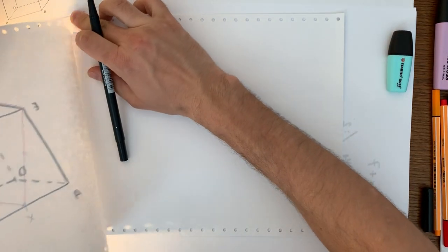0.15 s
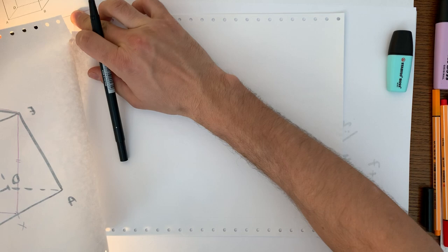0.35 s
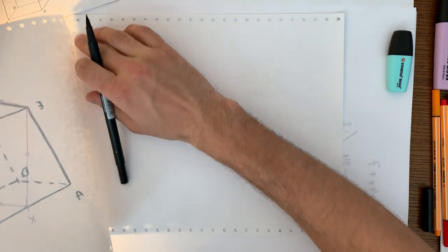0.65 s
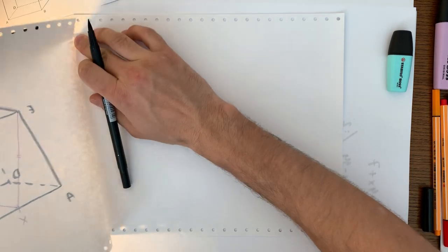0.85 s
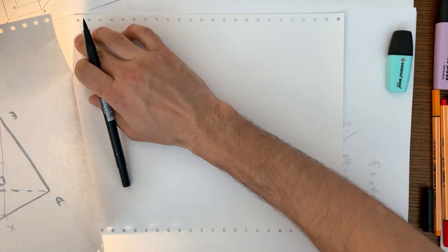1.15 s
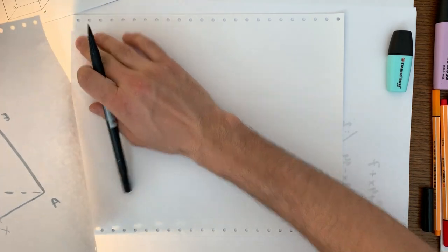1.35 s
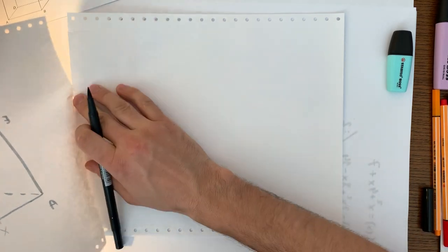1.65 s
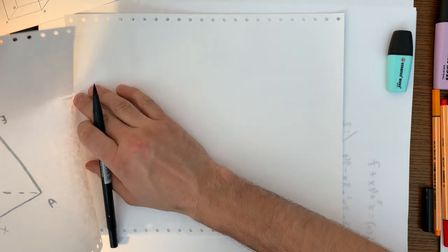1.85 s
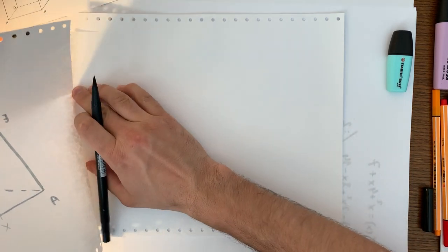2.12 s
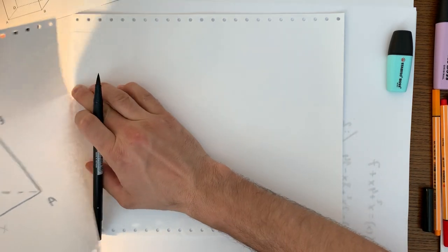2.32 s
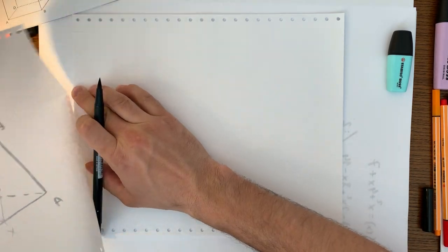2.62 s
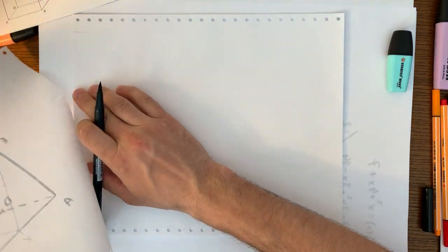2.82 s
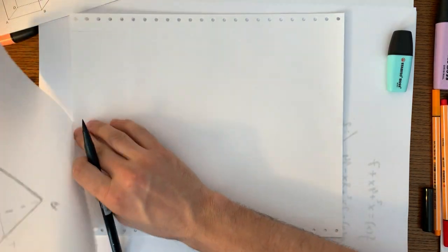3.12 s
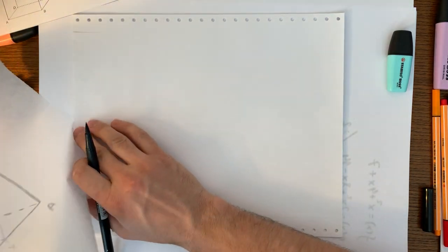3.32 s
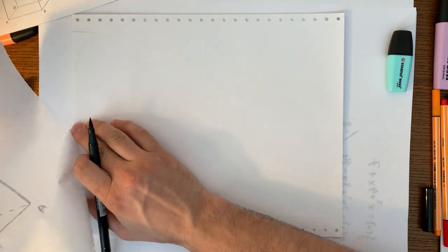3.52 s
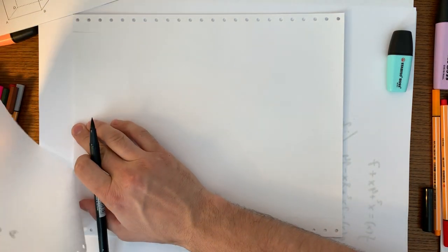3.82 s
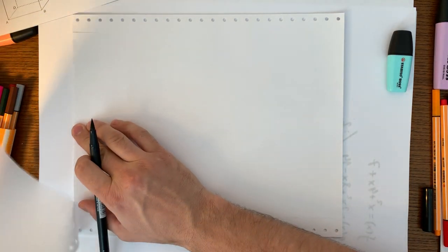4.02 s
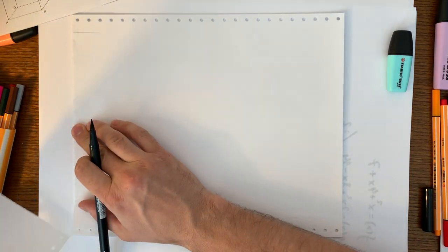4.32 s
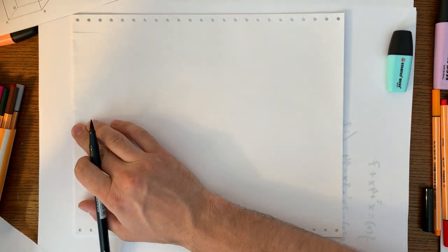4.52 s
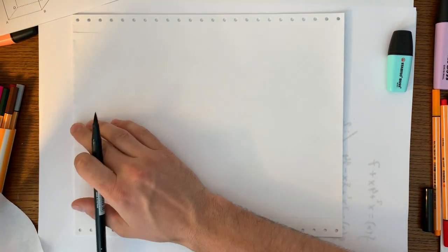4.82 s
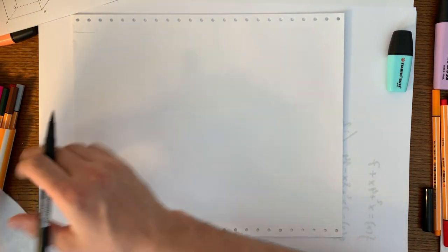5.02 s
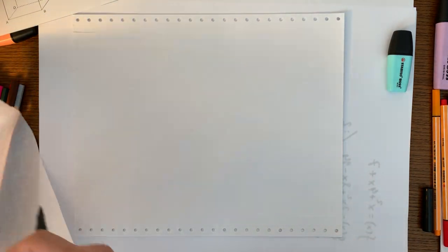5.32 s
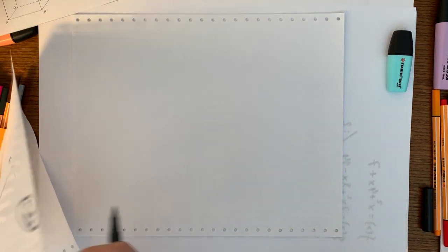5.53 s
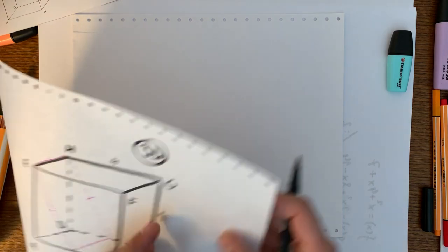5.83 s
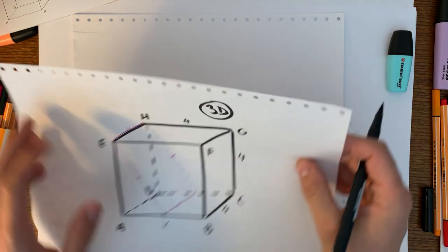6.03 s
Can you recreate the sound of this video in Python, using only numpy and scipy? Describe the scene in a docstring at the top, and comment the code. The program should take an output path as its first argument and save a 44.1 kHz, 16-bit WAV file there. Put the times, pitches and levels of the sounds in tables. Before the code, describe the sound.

Continuous paper is torn along its perforation on a desk in several short pulls. Each pull gives a run of bright, crisp cracks with a rasping hiss and a faint thud from the desk. Between pulls the sheets slide and bend with duller pops. After the longest run of tearing, the sheet rustles and flaps more softly. The sound is close, in a small, quiet room.

```python
"""Runs of bright cracks and rustling: continuous paper is torn along its perforation on a desk.
Each tiny paper bridge between the holes snaps and shakes the sheet, and creases give duller pops.
Between pulls the sheets slide and bend, and the desk thuds faintly under the hand.
The walls of the small, quiet room add a short tail to every snap and pop."""
import sys
import numpy as np
from scipy import signal
from scipy.fft import rfft, irfft
from scipy.io import wavfile

SR = 44100
rng = np.random.default_rng(int(sys.argv[2]) if len(sys.argv) > 2 else 0)


def output_pcm(signal):
    """Save a mono or channel-first signal as 16-bit PCM at the path in sys.argv[1].

    Samples are clipped to [-1, 1] before scaling.
    """
    pcm = np.clip(np.atleast_2d(signal).T, -1, 1) * 32767
    wavfile.write(sys.argv[1], SR, np.round(pcm).astype(np.int16))


N = 271788

# Paper sliding over paper: t/s, hiss level/dB
SLIDE_LEVELS = [(0.0, -48.5), (0.055, -85), (0.11, -58), (0.2, -77), (0.45, -71.5), (0.8, -77), (1.55, -74),
                (1.62, -62), (1.74, -63), (1.95, -88), (2.08, -66), (2.16, -78.5), (2.65, -71), (2.78, -63),
                (2.93, -58.5), (2.99, -72), (3.22, -56), (3.28, -63.5), (3.48, -61.5), (3.61, -76),
                (4.47, -61.5), (4.6, -67.5), (4.77, -60), (5.09, -68), (5.14, -57), (5.32, -50),
                (5.37, -57), (5.57, -63.5), (5.62, -68.5), (5.86, -70.5), (5.96, -58.5), (6.02, -63),
                (6.12, -57), (6.16, -70)]
# The hand pulls against the perforation: full force at t/s, swell/s, hold/s, rasp/dB, flapping/dB
HAND_PULLS = [(0.255, 0.15, 0.031, -44.5, -40), (0.905, .02, .005, -55, -47),
              (1.097, 0.065, 0.064, -42, -40.5), (1.325, 0.014, 0.016, -41.5, -41.5),
              (1.66, 0.063, 0.03, -55, -51), (1.786, 0.043, .01, -46.5, -46.5),
              (2.417, 0.02, 0.073, -37, -41.5), (3.692, 0.024, 0.13, -40, -44.5),
              (4.028, 0.22, 0.099, -37, -45), (4.281, 0.22, 0.086, -43, -46)]
# The held sheet bends and springs back: fully bent at t/s, swell/s, hold/s, rasp/dB, flapping/dB
SHEET_BENDS = [(0.11, 0.05, .06, -75, -78), (0.5, .06, 0.0037, -62, -55),
               (0.616, 0.12, 0.0093, -71.5, -66.5), (0.784, 0.11, 0.012, -76, -60),
               (2.075, 0.2, .07, -71.5, -74), (2.644, 0.18, 0.023, -62, -58),
               (2.863, 0.18, 0.075, -66.5, -67.5), (2.963, 0.086, 0.059, -68, -58.5),
               (3.228, 0.34, 0.046, -59.5, -61.5), (3.364, 0.07, 0.055, -52.5, -50),
               (3.528, 0.12, .02, -61, -63), (4.78, 0.66, 0.26, -63, -68), (5.166, 0.094, 0.18, -58, -59.5),
               (5.57, 0.17, 0.0081, -56.5, -54.5), (5.719, 0.044, .005, -64, -59),
               (5.822, 0.07, .03, -68, -54.5), (5.94, .06, 0.035, -86, -54.5),
               (6.08, .12, 0.074, -85, -56.5)]


def from_db(db):
    """Turn decibels into a number to multiply by."""
    return 10 ** (np.asarray(db) / 20)


def rms_one(x):
    """Scale a signal to an average power of 1."""
    return x / np.sqrt(np.mean(x ** 2) + 1e-20)


def at_hz(points, hz):
    """Read a table between its frequencies, with octaves evenly spaced."""
    freqs, values = np.transpose(points)
    return np.interp(np.log(hz + 1), np.log(freqs), values)


def colour(x, spectrum):
    """Give a sound the tone in the table; white noise keeps its power."""
    size = 8192
    gain = rms_one(from_db(at_hz(spectrum, np.fft.rfftfreq(size, 1 / SR))))
    cepstrum = irfft(np.log(gain))
    # Fold the filter so that it never rings before the sound arrives.
    cepstrum[1:size // 2] *= 2
    cepstrum[size // 2 + 1:] = 0
    return signal.fftconvolve(x, irfft(np.exp(rfft(cepstrum))))[:len(x)]


def resonate(x, hz, width_hz):
    """Let a sound ring broadly around one pitch."""
    r = np.exp(-np.pi * width_hz / SR)
    feedback = [1, -2 * r * np.cos(2 * np.pi * hz / SR), r * r]
    return signal.lfilter(np.array([1, 0, -1]) * (1 - r * r) / 2, feedback, x)


def drift(hz):
    """A random wobble of about size 1, mostly slower than hz."""
    r = np.exp(-2 * np.pi * hz / SR)
    return rms_one(signal.lfilter([1], [1, -2 * r, r * r], rng.standard_normal(N + SR))[SR:])


def fibres(size, spread_db):
    """Grainy noise: paper fibres slip in steps of uneven size."""
    return rms_one(rng.standard_normal(size) * from_db(spread_db * np.minimum(rng.exponential(1, size), 5)))


def gestures(moves, fade_db_per_s, rest_db):
    """Level in dB of hand movements that swell, hold and fade on top of a resting level."""
    t = np.arange(0, N, 32) / SR
    power = from_db(2 * rest_db)
    for full_at, swell, hold, level_db in moves:
        rising = 20 * (full_at - t) / max(swell, .005)   # gains 20 dB during the swell
        fading = fade_db_per_s * (t - full_at - max(hold, 0))
        loss_db = np.maximum(np.maximum(rising, fading), 0)
        power = power + from_db(2 * (level_db - loss_db))
    return np.interp(np.arange(N) / SR, t, 10 * np.log10(power + 1e-30))


def slide_db():
    """Level of the sliding at every sample."""
    return np.interp(np.arange(N) / SR, *np.transpose(SLIDE_LEVELS))


def sliding_hiss(grip):
    """One sheet rubs over another with a high hiss."""
    # Tone of sliding paper: f/Hz, level/dB
    tone = [(2350, -41), (4000, -12.5), (6000, -6.5), (8800, -4), (10000, -4), (12500, -4.5), (15600, -10),
            (15900, -35), (16500, -42)]
    return colour(from_db(slide_db() + 0.9 * grip + 0.7 * drift(100)) * fibres(N, spread_db=-1), tone)


def taut_rasp(grip):
    """Tight paper rasps when pulled or bent, and a little as it slides."""
    # Tone of tight paper: f/Hz, level/dB
    tone = [(710, -39), (1200, 0.5), (1480, -5.5), (2100, 1.5), (3500, 0), (4940, -10.5), (6000, -9.5),
            (7800, -19), (13200, -120)]
    moves = [(t, swell, hold, db) for t, swell, hold, db, _ in HAND_PULLS + SHEET_BENDS]
    level_db = gestures(moves, fade_db_per_s=144, rest_db=slide_db()[::32] - 8.5)
    return colour(from_db(level_db + 1.15 * grip + 1.9 * drift(62)) * fibres(N, spread_db=3), tone)


def room_air():
    """Faint, steady noise fills the quiet room."""
    # Tone of the background noise: f/Hz, level/dB
    tone = [(12, -36), (20, 9), (200, 2), (994, 4.5), (2240, -36), (4160, -6), (12500, -34), (15200, -26),
            (16500, -44)]
    return from_db(-72.5) * colour(rng.standard_normal(N), tone)


def snaps(events, tear_ms, ring_width, ring_db):
    """Fibres strain, break and tear on briefly; the sheet shakes and a patch of it rings."""
    # Tone of breaking fibres: f/Hz, level/dB
    crack_tone = [(1530, -14), (2600, -3.5), (3600, -7), (4500, -9.5), (8160, -10), (13100, -10.5),
                  (15500, -15.5), (16500, -14.5)]
    # Tone of the shaken sheet: f/Hz, level/dB
    sheet_tone = [(88, -68), (150, -11), (492, -9), (680, 6), (811, -6.5), (981, 5), (5000, -10),
                  (6500, -14.5), (11000, -120)]
    lead, size, split_hz = 1024, 4096, 8000
    crack, treble, shake, ring = np.zeros((4, N + size))
    ms = (np.arange(size) - lead) / SR * 1000   # time from the break
    desk_echo = from_db(-7) * np.exp(-((ms - 4.47) / 0.093) ** 2)
    spike = np.exp(-(ms / .11) ** 2) + desk_echo
    for t, crack_db, treble_db, shake_db, ring_hz, rise_ms in events:
        start = max(round(t * SR) - lead, 0)
        span = slice(start, start + size)
        stretch = 0.0017 * (max(crack_db, treble_db, shake_db) + 30)   # strong breaks last a bit longer
        fade_ms = tear_ms * np.exp(0.2 * rng.standard_normal() + stretch)
        sharpness = 3.73 / (1 + (rise_ms / 0.52) ** 2)   # slow breaks have no sharp peak
        tear_shape = np.exp(-np.abs(ms) / np.where(ms < 0, rise_ms, fade_ms))
        tear = sharpness * spike * rng.choice([-1, 1], size)
        tear += 1.106 * tear_shape * fibres(size, spread_db=6)
        crack[span] += from_db(crack_db) * tear
        treble[span] += from_db(treble_db) * tear
        push_shape = np.exp(-np.abs(ms) / np.where(ms < 0, rise_ms, 1.68 * fade_ms + 0.81))
        push = push_shape * fibres(size, spread_db=3)
        shake[span] += from_db(shake_db) * 0.56 * push
        ring[span] += from_db(shake_db + ring_db) * 3.65 * resonate(push, ring_hz, ring_width * ring_hz)
    keep_low = signal.butter(4, split_hz, fs=SR, output="sos")
    keep_high = signal.butter(4, split_hz, "high", fs=SR, output="sos")
    low = signal.sosfilt(keep_low, colour(crack[:N], crack_tone))
    high = signal.sosfilt(keep_high, colour(treble[:N], crack_tone))
    return low + high + colour(shake[:N], sheet_tone) + ring[:N]


def bridge_cracks():
    """Paper bridges snap brightly; the freed patch tends to ring higher as the tear goes on."""
    # Bridges and tight fibres snapping: t/s, crack/dB, crack's treble/dB, sheet shake/dB, rise/ms
    bridges = [(0.0236, -48, -53, -66, 0.081), (0.0731, -32, -27.5, -41.5, .1),
               (0.1249, -34, -41.5, -31, 0.22), (0.1814, -34, -29, -36, 0.29),
               (0.2076, -32, -32, -35.5, .16), (0.2336, -35, -32.5, -61, 3.9), (0.251, -35, -31, -39, .26),
               (0.2711, -38, -28, -49, 1.5), (0.28, -49, -31, -36, 0.11), (0.302, -33.5, -40, -40, 1),
               (0.4357, -57, -47.5, -68, .2), (0.926, -67, -52, -62, 1.5), (0.946, -46, -50, -64, .1),
               (1.0251, -61, -50, -72, .2), (1.0431, -35.5, -39, -40, .25),
               (1.055, -31.5, -33.5, -32, 0.14), (1.0688, -32, -36, -33, 0.091),
               (1.0877, -32, -38, -28.5, 0.12), (1.1094, -34, -28, -36, 0.36), (1.124, -28, -29, -30, 0.26),
               (1.1514, -35, -33, -33, .16), (1.3186, -31.5, -24.5, -32.5, .25),
               (1.3473, -30.5, -23, -31, 0.36), (1.377, -38, -44, -47, 8.9),
               (1.6255, -31.5, -32, -49, 0.096), (1.6575, -34, -51, -37, 1.1), (1.741, -51, -42, -58, .22),
               (1.7706, -27.5, -32.5, -29.5, 0.48), (1.7886, -33.5, -38, -33, 0.19),
               (2.0556, -64, -46.5, -65, 1.9), (2.38, -56, -46, -56, .3), (2.393, -27.5, -25, -30, 0.57),
               (2.403, -32, -25, -32.5, 2.1), (2.4206, -42, -29, -29, 0.14),
               (2.4441, -26, -20.5, -25.5, 0.33), (2.4589, -21.5, -25, -28, 0.33),
               (2.4825, -25, -18, -25.5, 0.54), (2.498, -43, -30, -52, .73),
               (3.047, -51.5, -43.5, -60, .17), (3.1645, -57, -53, -67, .38), (3.4044, -49, -46, -48, .3),
               (3.479, -36.5, -38.5, -34.5, 1.9), (3.6235, -46, -46, -44, .41),
               (3.6733, -33.5, -32, -39, 0.34), (3.6942, -38, -36, -32, .3),
               (3.7237, -28.5, -26.5, -39, 0.16), (3.743, -26.5, -25, -37, 0.89),
               (3.7691, -27, -23, -44, .6), (3.777, -34, -52, -31, 5.4), (3.7993, -35, -27, -41, .26),
               (3.8284, -51, -27, -37, .2), (3.8905, -34.5, -25, -29.5, 0.12), (3.919, -44, -60, -36, .6),
               (3.9471, -41, -23.5, -32, 0.47), (3.9672, -45, -57, -33.5, 2.6),
               (3.9905, -34, -27, -39, .15), (4.0253, -47, -26, -57, .3), (4.05, -41, -23, -37, 1.4),
               (4.0726, -40, -28.5, -48, .3), (4.1009, -52, -29, -40, .32), (4.132, -54, -28, -40, 4.7),
               (4.1576, -33, -55, -33, 1), (4.1958, -33.5, -24.5, -52, 2), (4.2214, -42, -54, -37.5, 2.4),
               (4.229, -45, -41, -56, 0.66), (4.2477, -40, -32, -48, 1.1), (4.28, -49, -32.5, -41.5, 5.4),
               (4.3054, -52, -36, -33, 1.6), (4.335, -30.5, -39, -55, 0.4), (4.3466, -37, -30.5, -48, 4.6),
               (4.3744, -44, -35, -52, .8), (4.394, -45, -35, -50, 2.7), (4.4108, -43, -35.5, -42.5, 13),
               (4.7319, -57, -51, -69, .4), (5.329, -51, -39, -39.5, .36),
               (5.5077, -36.5, -33, -37.5, 0.64)]
    events = []
    for t, crack_db, treble_db, shake_db, rise_ms in bridges:
        ring_hz = (1270 + 170 * t) * np.exp(0.15 * rng.standard_normal())
        events.append((t, crack_db, treble_db, shake_db, ring_hz, rise_ms))
    return snaps(events, tear_ms=3.3, ring_width=0.31, ring_db=0.084)


def wall_tail(sound):
    """The room stores the sound's power in each half octave and gives it back as fading noise."""
    # How long the room rings: f/Hz, time to fade by 60 dB/s
    fade_times = [(200, 0.64), (530, 0.78), (1390, 0.083), (3680, 0.04), (9700, 0.76)]
    edges_hz = 140 * 2 ** np.arange(0, 7.1, .5)
    noise = rng.standard_normal((2, N))
    build = np.exp(-1000 / (0.7 * SR))   # the tail builds up in 0.7 ms
    tail = 0
    for k, (low, high) in enumerate(zip(edges_hz, edges_hz[1:])):
        hz = np.sqrt(low * high)
        band = signal.butter(2, [low, high], "band", fs=SR, output="sos")
        keep = from_db(-120 / (at_hz(fade_times, hz) * SR))
        power = signal.sosfilt(band, sound) ** 2
        stored = signal.lfilter([(1 - keep) * (1 - build)], np.convolve([1, -keep], [1, -build]), power)
        gain = from_db(-9 - 2.5 * np.log2(hz / 1000))   # 2.5 dB weaker per octave up
        tail = tail + gain * np.sqrt(np.abs(stored)) * rms_one(signal.sosfilt(band, noise[k % 2]))
    return tail


def loose_flapping(grip):
    """The slack part of the sheet flaps with a lower sound and is never quite still."""
    # Tone of slack paper: f/Hz, level/dB
    tone = [(71, -33), (120, -20.5), (449, -3), (646, -1), (1020, 2.5), (1140, 1), (1770, -2), (3000, -9),
            (3900, -53), (6600, -120)]
    moves = [(t, swell, hold, db) for t, swell, hold, _, db in HAND_PULLS + SHEET_BENDS]
    level_db = gestures(moves, fade_db_per_s=153, rest_db=-78.5)
    return colour(from_db(level_db + 0.64 * grip + 2.56 * drift(19.6)) * fibres(N, spread_db=2.5), tone)


def tearing_hiss(grip):
    """The tearing paper hisses with each pull, more softly than it rasps."""
    # Tone of the tearing hiss: f/Hz, level/dB
    tone = [(2350, -42), (4000, -14), (8150, 1.5), (10000, -2), (12300, 0), (15500, -11), (16200, -23),
            (16500, -41)]
    moves = [(t, swell, hold, rasp_db - 7.5) for t, swell, hold, rasp_db, _ in HAND_PULLS]
    level_db = gestures(moves, fade_db_per_s=176, rest_db=-np.inf)
    return colour(from_db(level_db + 2.5 * grip + 0.46 * drift(91)) * fibres(N, spread_db=-0.5), tone)


def desk_thuds():
    """The desk rumbles as the hand presses or bumps it."""
    # The hand's weight on the desk: t/s, hold/s, level/dB
    presses = [(0.25, .04, -58), (0.732, .01, -70), (0.92, 0.024, -63), (1.062, 0.11, -59),
               (1.315, 0.023, -57.5), (1.645, 0.054, -68), (1.777, .02, -61), (2.192, 0.0075, -62.5),
               (2.41, .08, -56.5), (2.654, 0.038, -73), (3.424, .06, -61), (3.675, 0.12, -60.5),
               (3.893, 0.13, -61), (4.097, 0.11, -56), (4.267, 0.098, -61), (5.1, 0.13, -67),
               (5.285, 0.036, -63.5)]
    # Tone of the desk: f/Hz, level/dB
    tone = [(12, -48), (20, -8), (54, 2.5), (173, -4), (212, -10.5), (296, -7), (350, 3), (460, -20),
            (770, -120)]
    swell_s = 0.039
    moves = [(t, swell_s, hold, db) for t, hold, db in presses]
    level_db = gestures(moves, fade_db_per_s=250, rest_db=-77.5)
    return colour(from_db(level_db + 2.4 * drift(17)) * rng.standard_normal(N), tone)


def crease_pops():
    """Creases pop, duller and hollower than the bridges: less treble and a narrower ring."""
    # Creases popping: t/s, crack/dB, sheet shake/dB, ring f/Hz, rise/ms
    creases = [(0.493, -44, -47, 1740, 1.1), (0.531, -45, -47, 1090, 0.69), (0.609, -75, -48, 910, 0.49),
               (0.7311, -62, -49, 980, 4.1), (0.7901, -83, -51.5, 1170, 3.5), (0.9044, -35, -35, 1570, 2.5),
               (1.856, -47, -51, 1160, .43), (2.12, -69, -47.5, 1800, .2), (2.18, -56, -59, 1020, .33),
               (2.2, -71, -52.5, 680, 0.91), (2.294, -72, -60.5, 910, .9), (2.832, -69, -51, 1990, .9),
               (2.8497, -66, -54, 2000, .9), (2.8795, -60, -49, 1970, 1.2), (2.9908, -63, -45, 1980, .3),
               (3.0058, -50, -38, 2160, 0.38), (3.2601, -51, -46, 2100, .7), (3.2682, -69, -41, 2980, .7),
               (3.4406, -64, -39, 1980, 4.3), (3.487, -37.5, -37, 1560, 0.4), (3.645, -65, -52, 1490, 3.5),
               (4.5224, -71, -54, 1180, 7.2), (4.87, -57, -51, 2050, .84), (4.889, -56, -47, 1380, 1),
               (5.1213, -54.5, -45.5, 2500, 0.85), (5.487, -62, -49, 1920, 3.9),
               (5.551, -46, -54, 1800, .9), (5.5748, -40, -45.5, 1930, 6.5), (5.7068, -48, -46.5, 1870, .2),
               (5.719, -45.5, -51, 1760, 0.43), (5.7658, -63, -49.5, 1250, 3.4),
               (5.8257, -52.5, -43.5, 1720, 0.36), (5.859, -67, -52, 1030, .67),
               (5.8686, -61, -48, 1580, .3), (5.9457, -67, -51, 970, 11), (5.9812, -77, -57, 1120, 12),
               (6.0556, -57, -55, 1040, 5.4), (6.079, -47.5, -41, 1160, 0.26)]
    events = [(t, db, db - 24, shake_db, hz, rise_ms) for t, db, shake_db, hz, rise_ms in creases]
    return snaps(events, tear_ms=3.25, ring_width=0.19, ring_db=3.7)


def scene():
    """Cracks and pops with their room tail, over rustling, desk thuds and still air."""
    cracks = bridge_cracks() + crease_pops()
    grip = drift(31.4)   # the hand's grip sticks and slips, jerking all the rustles together
    rustle = sliding_hiss(grip) + taut_rasp(grip) + loose_flapping(grip) + tearing_hiss(grip)
    return (cracks + wall_tail(cracks) + rustle + desk_thuds() + room_air())[None]


def record(dry):
    """Cut away the highest treble steeply."""
    cutoff_hz = 16300
    return signal.sosfilt(signal.cheby2(14, 60, cutoff_hz, fs=SR, output="sos"), dry)


dry = scene()
out = record(dry)
output_pcm(out)
```